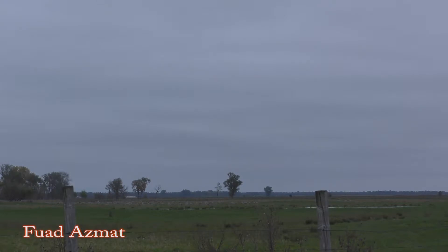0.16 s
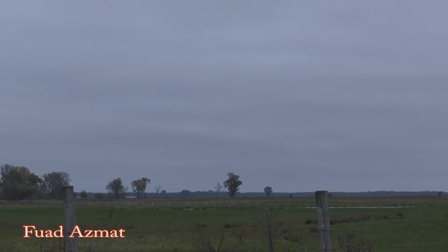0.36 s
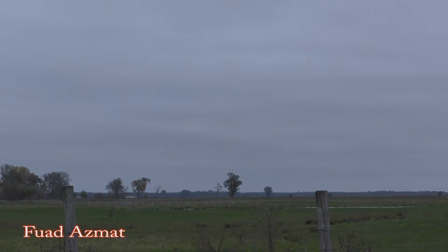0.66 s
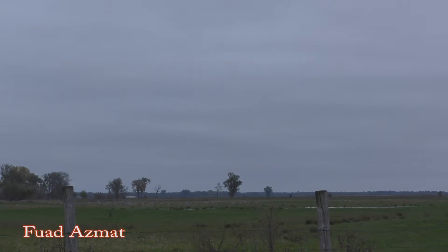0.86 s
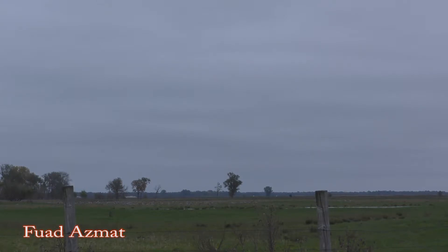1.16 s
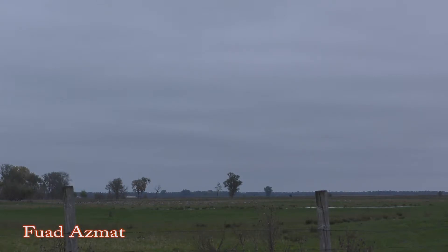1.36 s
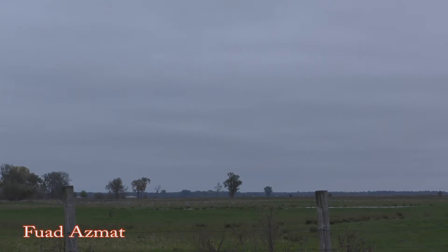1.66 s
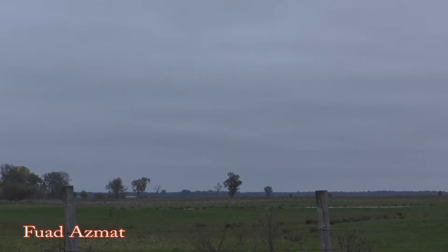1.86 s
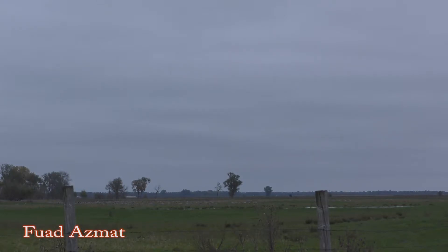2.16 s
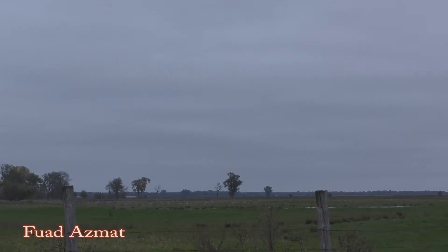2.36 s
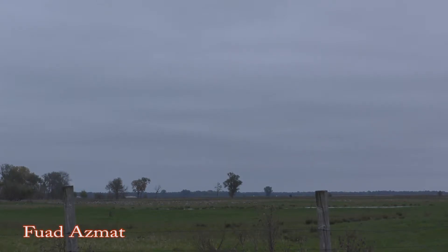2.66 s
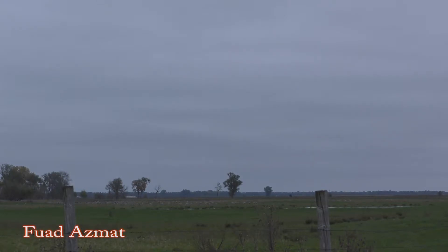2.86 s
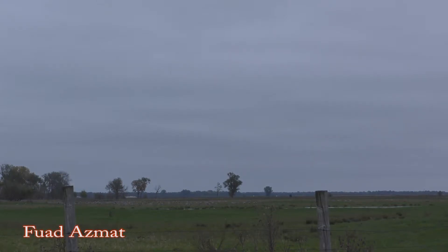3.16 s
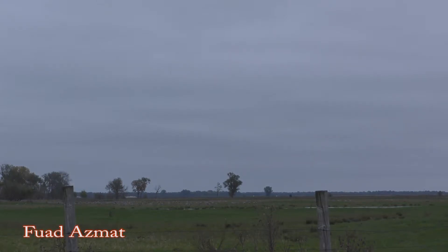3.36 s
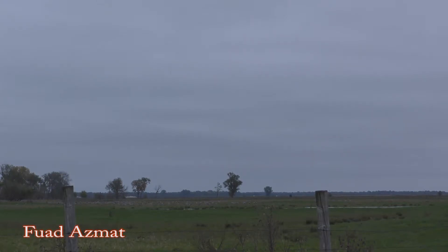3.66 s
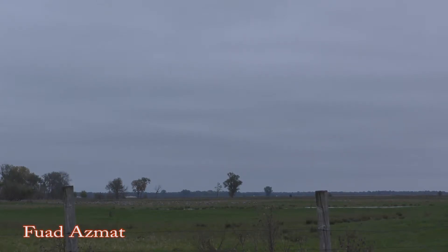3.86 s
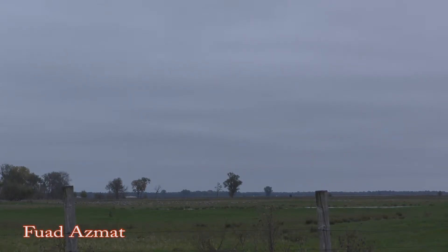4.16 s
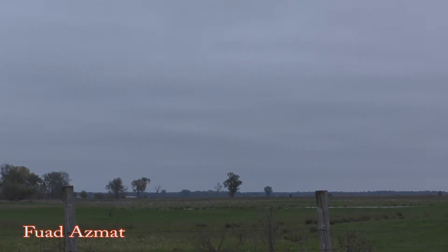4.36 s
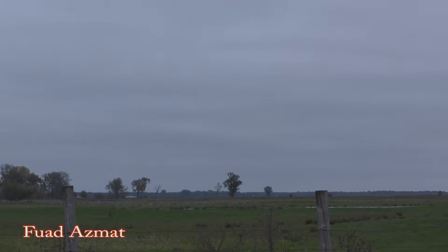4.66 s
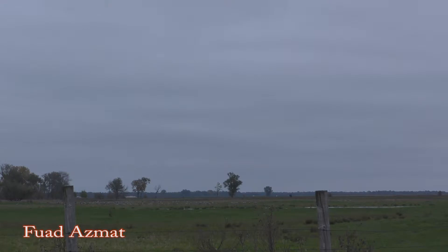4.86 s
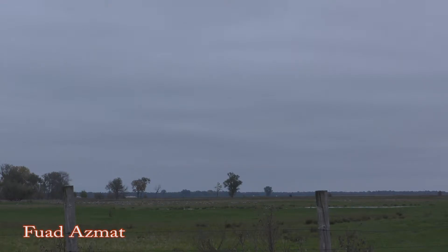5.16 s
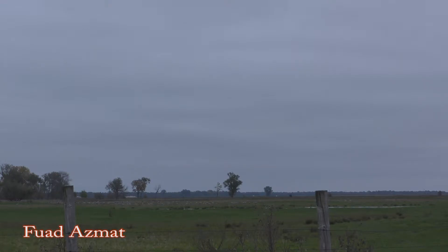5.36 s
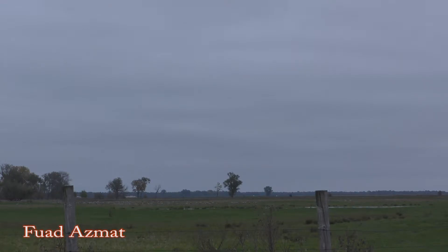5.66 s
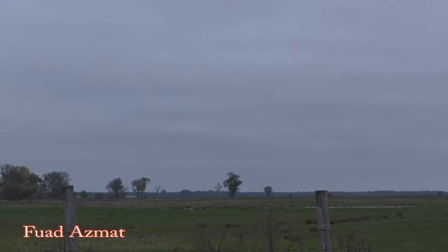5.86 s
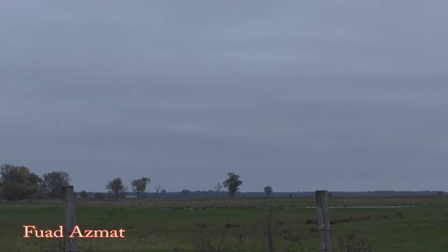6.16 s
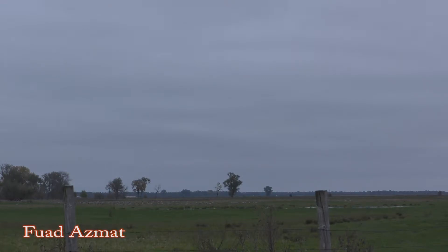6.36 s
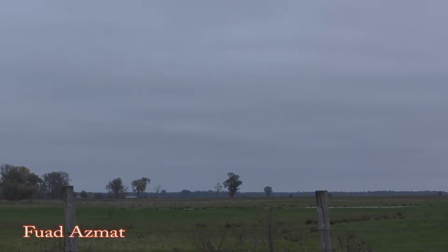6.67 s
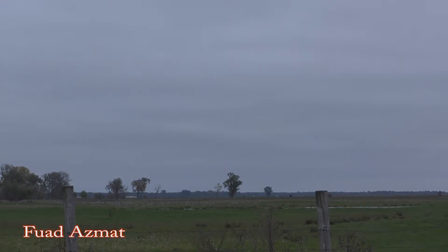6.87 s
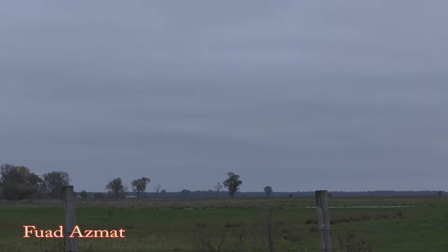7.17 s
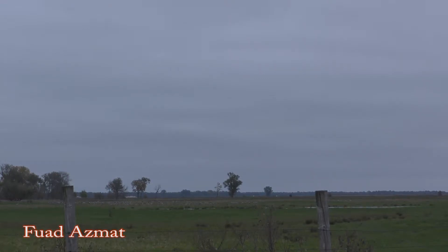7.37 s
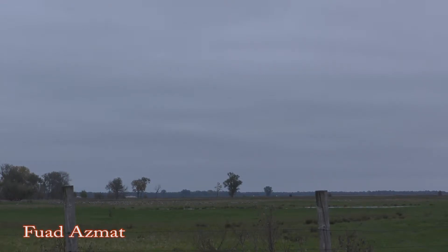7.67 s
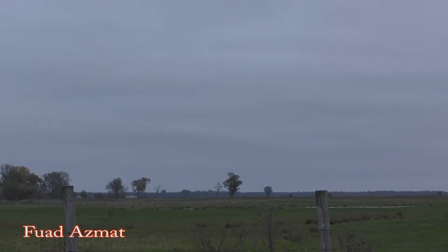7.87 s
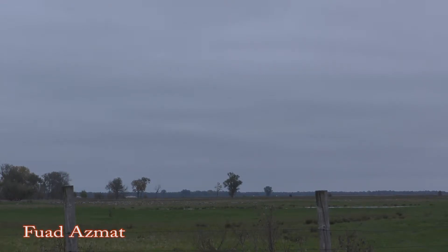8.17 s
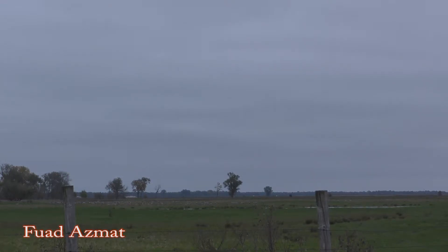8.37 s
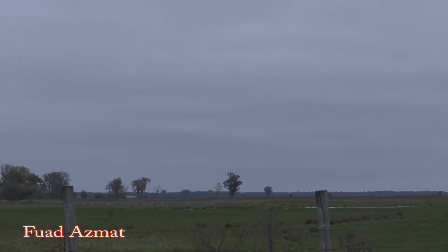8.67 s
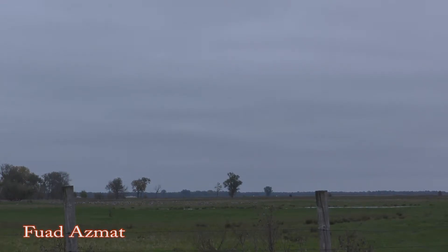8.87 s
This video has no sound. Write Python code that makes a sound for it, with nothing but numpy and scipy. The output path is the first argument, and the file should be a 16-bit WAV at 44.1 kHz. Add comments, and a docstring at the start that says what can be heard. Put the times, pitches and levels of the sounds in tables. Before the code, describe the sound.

A big crane flock bugles and rattles across a marshy field, nearer birds standing out in short rolling bursts above soft hiss and wind rumble.

```python
"""From the start a marshy field hisses, insects throb and light wind buffets two microphone ports, mostly the left.
Under this a far crane flock, many overlapping rattles, blurs into a rolling chorus with scattered echoes.
Near cranes soon rattle, in trains of short voiced pulses echoing in the long coiled windpipe, and sound held
notes of steady partials. From about one second small birds add brief near-sine whistles and chirps."""
import sys
import numpy as np
from scipy import signal
from scipy.fft import rfft, irfft
from scipy.io import wavfile
from scipy.ndimage import uniform_filter1d

SR = 44100
rng = np.random.default_rng(int(sys.argv[2]) if len(sys.argv) > 2 else 0)


def generate_wav(signal):
    """Clip the signal to [-1, 1] and save it as 16-bit WAV at the path in sys.argv[1]."""
    frames = np.transpose(np.atleast_2d(signal))
    scaled = np.clip(frames, -1, 1) * 32767
    pcm = np.round(scaled).astype(np.int16)
    wavfile.write(sys.argv[1], SR, pcm)


N = 397782
TIME = np.arange(N) / SR

# diffuse hiss, shape of its spectrum: frequency_hz, density_db (relative, per Hz)
HISS_SPECTRUM = [(120, -14.5), (300, -17.5), (900, -14.5), (2000, -21), (3000, -30), (3900, -34),
                 (6000, -39.5), (9000, -41.5), (15500, -51)]
HISS_DB = -34.5
# insect bands: centre_hz, width_hz, level_db
INSECT_BANDS = [(4744, 400, -53.5), (7010, 310, -63)]
# wind at the ports, before the offset of each port: time_s, level_db
WIND_LEVEL = [(0.0, -36), (1.35, -31), (1.7, -35), (3.7, -39), (5.49, -38), (6.79, -32), (9.0, -37.5)]
# wind rumble, shape of its spectrum: frequency_hz, density_db (relative)
WIND_SPECTRUM = [(12, -8.5), (25, 6.5), (55, 2), (140, -13), (400, -47.0)]

# throat resonances: centre_hz, width_hz, level_db (relative)
THROAT_RESONANCES = [(2617, 360, 13.5), (4090, 560, 6), (4890, 320, 5.5), (7450, 3100, -9)]
# windpipe modes in the buzz: frequency_hz, level_db (relative to the buzz level of the call)
PIPE_MODES = [(450, -42), (560, -6.5), (1050, -4.5), (1380, -10.5), (1700, -4.5), (2100, -13),
              (2500, -32.5)]
PIPE_S = .0055  # round trip of the windpipe
# a bird that drops into its pitch also sounds a second membrane SPLIT_HZ above it
SPLIT_GAIN, SPLIT_HZ = 2.37, 117.2

# rattling calls: first_pulse_s, last_pulse_s, beat_ms, pitch_hz, end_pitch_hz,
# drop (into each pulse, share of the pitch), level_db, swell_db (deficit of the first pulse),
# last_pulse_db (added to the last pulse), pulse_ms (first pulse), left_minus_right_db,
# octave_db, buzz_db, rasp_db (these three against the pitch; rasp as at the last pulse)
RATTLES = [(.030, .165, 33.6, 900, 990, .1, -14, 5, 0, 15, 0, -24, -8, -31),
           (.749, 1.008, 40.6, 820, 765, .05, -3, 11, -9, 12, -1.5, -10, -17, -36),
           (1.203, 1.405, 41, 750, 780, .08, -9, 2, 0, 15, -2, -8, -10, -42),
           (1.283, 1.524, 37.2, 560, 810, .05, -8, 10, -14, 13, -2, -10, -8, -20),
           (1.229, 1.441, 35.4, 990, 940, .15, -7, 2, -3, 17, 0, -20, -14, -42),
           (1.609, 1.804, 39.5, 895, 890, .05, -1, 9, -4, 16, 0, -13, -17, -41),
           (2.540, 2.640, 48.5, 715, 715, .05, -19, 2, -2, 18, .5, -20, -8, -33),
           (2.851, 2.954, 49.5, 735, 722, .03, -12, 2, 0, 21, -3.5, -30, -4, -36),
           (3.141, 3.279, 45.5, 880, 900, .2, -12, 4, -2, 22, 6, -12, -14, -34),
           (3.390, 3.488, 48, 830, 815, .05, -21, 2, -2, 17, -1.5, -15, -14, -34),
           (3.668, 3.912, 46.8, 790, 850, .05, -22, 2, -2, 17, -1, -20, -12, -36),
           (3.990, 4.231, 50, 695, 675, .05, -12, 7, -3, 18, -2, -35, -14, -38),
           (4.636, 4.823, 40.6, 900, 930, .12, -13, 3, 0, 16, 7, -22, -11, -38),
           (4.643, 4.808, 44, 930, 1000, .1, -13, 2, -7, 13, 7, -16, -10, -38),
           (5.317, 5.609, 41.6, 900, 880, .3, -13, 2, -3, 14, 1, -8, -9, -35),
           (5.300, 5.559, 42.1, 745, 770, .12, -6, 2, -6, 13, -1.5, -8, -9, -35),
           (5.694, 5.849, 39, 850, 865, .05, -3, 14, -3, 20, -1, -23, -14, -40),
           (5.727, 5.914, 46.7, 500, 580, .05, -13, 14, 0, 16, 0, -8, 6, -4),
           (5.905, 6.119, 38.8, 755, 705, .08, 2, 6, -6, 19, 3.5, -5, -12, -20),
           (6.193, 6.305, 38.3, 850, 850, .05, -4, 3, -3, 13, -.5, -8, -9, -30),
           (6.312, 6.430, 39.5, 990, 950, .1, -11, 3, -3, 18, 2, -10, -9, -30),
           (6.400, 6.506, 53, 690, 725, .03, -12, 5, -2, 32, -4, -8, -9, -30),
           (6.768, 6.953, 46.5, 775, 750, .05, -20, -5, -2, 18, 7, -23, -17, -40),
           (7.084, 7.335, 50.2, 810, 770, .05, -4, 11, -4, 14, -3.5, -20, -18, -23),
           (7.740, 7.905, 42.4, 760, 740, .05, -13, 3, -3, 18, 6, -33, -7, -33),
           (8.012, 8.164, 52.3, 1050, 930, .08, -8, 3, -1, 17, 8, -8, -10, -30),
           (8.316, 8.514, 38.5, 880, 850, .12, -8, 5, -2, 14, -2, -16, -14, -22),
           (8.601, 8.909, 51.6, 785, 830, .05, -2, 16, -4, 15, -2.5, -12, -20, -19)]
LENGTHEN = 0.57  # share by which the pulses grow towards the end
SCATTER_DB, PITCH_SCATTER = 1, 0.012  # pulse-to-pulse spread of level (dB) and pitch (share)
SWELL_PULSES = 1.28  # a rattle swells over its first pulses
RASP_GROWS_DB = 9  # the rasp comes up towards the end of a rattle
FLOCK_DB = -34.5  # each half of the distant flock, ahead of ports and echoes

# held notes: start_s, length_s, pitch_hz, end_pitch_hz, partial_1_db, partial_2_db, partial_3_db,
# buzz_db, rasp_db, left_minus_right_db
HELD_NOTES = [(0.178, 0.085, 549, 480, -39, -58, -25, -58, -62, 2),
              (1.157, 0.04, 1036, 1135, -22, -45, -55, -34, -50, 4),
              (1.465, .05, 564, 551, -19.5, -14.5, -20, -30, -41, 5),
              (2.746, 0.048, 543, 545, -50, -19, -26.5, -28, -58, 2.5),
              (2.805, 0.023, 555, 580, -53, -9, -15, -27, -57, 4),
              (2.975, .125, 576, 514, -34, -17, -22.5, -54, -51, 1),
              (3.296, 0.052, 900, 880, -19, -39, -54, -49, -60, 9),
              (4.847, 0.046, 888, 834, -20.5, -21.5, -64, -45, -56, 12),
              (5.249, .034, 1016, 1080, -18.5, -44, -60, -28.5, -56, 4),
              (6.12, .065, 552.7, 519, -16.5, -16, -18, -17, -28.5, 4.5),
              (6.506, 0.048, 657, 639, -28, -14.5, -25, -41, -58, 1.5),
              (6.536, 0.11, 579, 539, -35, -24, -27, -22.5, -57, -1.5),
              (6.641, 0.084, 778, 775, -14, -32.5, -62, -70, -57, 9),
              (7.347, 0.055, 575, 544, -26.5, -25, -33, -41, -38.5, -4.5),
              (7.593, 0.093, 772, 738, -20.5, -35, -52, -38, -57, 6),
              (7.999, .115, 509.3, 496, -32.5, -30, -14.5, -27.5, -43, 5),
              (8.916, .085, 581, 566, -20.5, -19.5, -22.5, -19.5, -27, 4)]
UPPER_DB = -10  # step from partial 3 of a held note to 4, and again to 5 and 6

# whistles and chirps of small or young birds, before flutter:
# start_s, length_s, pitch_hz, end_pitch_hz, level_db, left_minus_right_db
CHIRPS = [(1.018, 0.15, 2120, 1910, -28, 0), (1.87, .025, 3580, 3930, -42, 5),
          (2.006, 0.026, 3870, 4030, -44, 2), (4.555, 0.019, 1330, 1330, -27, 0),
          (4.597, 0.022, 1313, 1410, -28.5, 6), (4.755, 0.085, 1500, 1460, -26, 3),
          (7.861, 0.1, 2140, 2020, -25, 1.5), (8.26, 0.073, 3780, 3770, -42, 7)]
WAVER, WAVER_DB = 0.016, 5  # unsteadiness of the whistles in pitch (share) and level (dB)

# phase between the ports: frequency_hz, left_lead_rad
PORT_LEAD = [(30, 0), (1550, .8), (2930, 4), (4390, 4.5), (9220, 9.6), (15400, 16)]
# colour of the ports: frequency_hz, left_minus_right_db
PORT_TILT = [(700, 0.5), (1290, -1.5), (2380, -12), (4400, -3), (8120, 7.5)]
TOP_HZ = 15800  # upper limit of the microphone chain


def amp(db):
    """Decibel law: gain of a level in dB."""
    return 10 ** (np.asarray(db) / 20)


def on_bins(rows):
    """Spectral interpolation: a table read at every FFT bin on a log-frequency axis."""
    hz, value = np.transpose(rows)
    return np.interp(np.log(np.arange(N // 2 + 1) * SR / N + 1), np.log(hz), value)


def ring(x, hz, width_hz):
    """Two-pole resonance: gain 1 at the centre."""
    return signal.lfilter(*signal.iirpeak(hz, hz / width_hz, SR), x)


def unit(x):
    """Normalisation: scaled to rms 1."""
    return x / np.sqrt(np.mean(x ** 2))


def walk(rate):
    """Slow random modulation: levels held 1 / rate s and slewed, with spread near 1."""
    hold = int(SR / rate)
    steps = np.repeat(rng.standard_normal(N // hold + 1), hold)
    return 1.05 * uniform_filter1d(steps, hold)[:N]


def add(track, start_s, x):
    """Superposition: mixes x into the track from start_s."""
    i = int(max(start_s, 0) * SR)
    track[..., i:i + x.shape[-1]] += x[..., :max(N - i, 0)]


def panned(x, pan_db):
    """Level stereophony: left and right copies that differ by pan_db."""
    return x * amp(np.array([[.5], [-.5]]) * pan_db)


def insects():
    """Narrow-band noise: cascaded resonances select insect bands whose levels throb."""
    bugs = np.zeros(N)
    for hz, width_hz, db in INSECT_BANDS:
        white = rng.standard_normal(N)
        band = unit(ring(ring(white, hz, width_hz), hz, width_hz))
        bugs += amp(db + 0.8 * walk(25)) * band
    return bugs


def field_hiss():
    """Diffuse field: shaped noise, independent left and right."""
    spectrum = rfft(rng.standard_normal((2, N))) * amp(on_bins([(60, -60.0)] + HISS_SPECTRUM))
    return unit(irfft(spectrum, N)) * amp(HISS_DB + 0.21 * walk(2.7))


def wind():
    """Uncorrelated turbulence: low buffeting, unrelated at the two ports and stronger on the left."""
    spectrum = rfft(rng.standard_normal((2, N))) * amp(on_bins(WIND_SPECTRUM))
    port_db = np.array([[5], [-7]])
    level_db = np.interp(TIME, *np.transpose(WIND_LEVEL)) + port_db + 2 * walk(6)
    return unit(irfft(spectrum, N)) * amp(level_db)


def throat_noise():
    """Resonant filtering: breath noise through the throat resonances."""
    white = rng.standard_normal(N)
    return unit(sum(amp(db) * ring(ring(white, hz, w), hz, 2 * w) for hz, w, db in THROAT_RESONANCES))


def voice(length, hz, end_hz, partial_db, buzz_db, rasp_db, noise, blip, snap, flap_db=6):
    """Source and pipe modes: one syrinx opening gives a blip one mode up, the pitch, and a buzz on many modes."""
    t = np.arange(int((length + .012) * SR)) / SR
    rise = np.sin(np.pi / 2 * np.clip(t / 0.0047, 0, 1)) ** 2
    fall = np.clip((length + 0.0048 - t) / 0.0016, 0, 1)
    gate = rise * (1 - 0.56 * t / length).clip(0) * fall

    order = np.round(hz * PIPE_S)  # the pipe mode that the pitch sits on
    glide_hz = hz + (end_hz - hz) * (t / length) ** 2 + snap * hz * np.exp(-t / 0.0071)
    turn = 2 * np.pi * np.cumsum(glide_hz) / SR / order  # phase of the lowest pipe mode
    tone = sum(amp(db) * np.sin((k + 1) * order * turn + k) for k, db in enumerate(partial_db))

    # the opening snap rings the neighbouring mode, which beats once with the pitch
    pitch_gain = amp(partial_db[0])
    tone *= 1 - .25 * blip * np.exp(-(t / .006) ** 2)
    tone += pitch_gain * blip * np.exp(-(t / 0.0044) ** 2) * np.sin((order + 1) * turn - 4.6)
    split_phase = order * turn + 2 * np.pi * (SPLIT_HZ * t + rng.random())
    tone += pitch_gain * SPLIT_GAIN * max(snap - .03, 0) * np.sin(split_phase)

    modes = np.arange(3, 36)
    mode_hz = modes * hz / order
    low = amp(buzz_db + np.interp(mode_hz, *np.transpose(PIPE_MODES), right=-80))
    throat = sum(amp(db) / (1 + (2 * (mode_hz - f) / w) ** 2) for f, w, db in THROAT_RESONANCES)
    high = amp(rasp_db) * throat
    level_luck, phase_luck = rng.standard_normal((len(modes), 2)).T

    # the membranes flap unevenly, so each mode comes and goes on its own
    steps = rng.standard_normal((len(modes), len(t) // 256 + 1))
    flap = np.repeat(steps, 256, axis=1)[:, :len(t)]
    flap = amp(flap_db * np.tanh(uniform_filter1d(flap, 256, axis=1)))
    mode_gain = (low + 0.2 * high) * amp(5.4 * np.tanh(level_luck))
    buzz = mode_gain @ (flap * np.sin(np.outer(modes, turn) + 2 * phase_luck[:, None]))
    buzz *= np.exp(-blip * t / 0.026)  # in a rattle pulse the side modes die first

    rasp = amp(rasp_db) * noise[:len(t)] * np.exp(-t / (0.04 - 0.044 * blip))
    return gate * (tone * flap[0] ** .25 + buzz + rasp)


def rattle(track, noise, first, last, beat_ms, hz, end_hz, drop, db, swell_db, last_db, pulse_ms,
           pan_db, octave_db, buzz_db, rasp_db):
    """Pulse train: an even beat that swells, lengthens and drifts in pitch; the last keeps its own time."""
    beat_s = beat_ms / 1000
    times = np.append(np.arange(first, last - .7 * beat_s, beat_s), last)
    k = np.arange(len(times))
    share = k / k[-1]
    level_luck, pitch_luck = rng.standard_normal((len(times), 2)).T
    level = db - swell_db * np.exp(-k / SWELL_PULSES) + last_db * (k == k[-1]) + SCATTER_DB * level_luck
    pitch = (hz + (end_hz - hz) * share) * (1 + PITCH_SCATTER * pitch_luck)
    lengths = pulse_ms / 1000 * (1 + LENGTHEN * share ** 2)
    rasps = rasp_db - RASP_GROWS_DB * (1 - share)
    for s, gain, f, length, rasp in zip(times, amp(level), pitch, lengths, rasps):
        breath = noise[rng.integers(N - SR):]
        x = voice(length, f, .985 * f, (0, octave_db), buzz_db, rasp, breath, blip=.7, snap=drop)
        add(track, s - .0035, panned(gain * x, pan_db))


def far_flock(noise, count):
    """Superposed pulse trains: many overlapping rattles from one side of the marsh."""
    pair = np.zeros((2, N))
    for k, (s, span, beat, pitch, size) in enumerate(rng.random((count, 5))):
        start = (k + 2 * s - 1.5) / count * N / SR
        hz = 650 + 420 * pitch
        rattle(pair, noise, start, start + .1 + .2 * span, beat_ms=37 + 15 * beat, hz=hz, end_hz=.97 * hz,
               drop=0.082, db=-9 * size, swell_db=1.1, last_db=-3.3, pulse_ms=15, pan_db=0,
               octave_db=-4.5, buzz_db=-6.0, rasp_db=-15.0)
    track = pair.mean(axis=0)
    # somewhere a bird is always calling, so the chorus keeps an even level
    power = track ** 2
    slow = np.sqrt(uniform_filter1d(power, SR // 3) + 0.018 * np.mean(power))
    return track / slow * amp(FLOCK_DB)


def marsh_tail(x, t60_s, wet_db):
    """Diffuse reverberation: scattered echoes from ground and reeds, different at each port."""
    t = np.arange(SR // 2) / SR
    decay = np.exp(-np.log(1000) * t / t60_s)
    tail = rng.standard_normal((2, len(t))) * decay * (t > .008)
    tail = ring(tail, 1075.0, 2000.0)
    tail /= np.sqrt(np.sum(tail ** 2) / 2)
    return amp(wet_db) * signal.fftconvolve(x[None], tail, axes=1)[:, :N]


def near_rattles(noise):
    """Pulse trains at close range: the rattles that stand out."""
    track = np.zeros((2, N))
    for row in RATTLES:
        rattle(track, noise, *row)
    return track


def held_notes(noise):
    """Sustained harmonic source: six partials without the opening snap."""
    track = np.zeros((2, N))
    for s, length, hz, end_hz, *partial_db, buzz_db, rasp_db, pan_db in HELD_NOTES:
        partial_db = partial_db + [partial_db[2] + UPPER_DB * k for k in (1, 2, 3)]
        breath = noise[rng.integers(N - SR):]
        x = voice(length, hz, end_hz, partial_db, buzz_db, rasp_db, breath, blip=0, snap=0, flap_db=9.0)
        add(track, s, panned(x, pan_db))
    return track


def chirps():
    """Frequency and amplitude modulation: short near-sine whistles that glide and waver."""
    track = np.zeros((2, N))
    bend, flutter = 1 + WAVER * walk(60), amp(WAVER_DB * walk(70))
    for s, length, hz, end_hz, db, pan_db in CHIRPS:
        u = np.arange(int(length * SR)) / (length * SR)  # progress from 0 to 1
        here = slice(int(s * SR), int(s * SR) + len(u))
        glide_hz = (hz + (end_hz - hz) * u ** 2) * bend[here]
        tone = flutter[here] * np.sin(2 * np.pi * np.cumsum(glide_hz) / SR)
        add(track, s, panned(amp(db) * np.sin(np.pi * u) ** .5 * tone, pan_db))
    return track


def ports(x, pan_db):
    """Interaural-style phase and level: sound leads at the left port; the housing colours the two differently."""
    half = np.array([[.5], [-.5]])
    pair = rfft(x) * amp(half * on_bins(PORT_TILT)) * np.exp(1j * half * on_bins(PORT_LEAD))
    return irfft(pair, N) * amp(half * pan_db)


def scene():
    """Linear superposition: field, wind, flock, near birds and echoes."""
    noise = throat_noise()
    bugs = insects()
    air = field_hiss() + wind()
    one_side, other_side = far_flock(noise, count=70), far_flock(noise, count=70)
    flock = ports(one_side, 1.9) + ports(other_side, 0.0)
    flock += marsh_tail(one_side + other_side, t60_s=1.0, wet_db=-13.5)
    near = near_rattles(noise) + held_notes(noise)
    echoes = marsh_tail(near.mean(axis=0), t60_s=.3, wet_db=-20)
    return ports(near + bugs + chirps(), 0.) + echoes + flock + air


def record(dry):
    """Saturation and band limiting: the input saturates near full scale and the top is cut."""
    loud = dry / (1 + dry ** 10) ** (1 / 10)
    return signal.sosfilt(signal.ellip(12, .2, 60, TOP_HZ, fs=SR, output="sos"), loud)


dry = scene()
out = record(dry)
generate_wav(out)
```